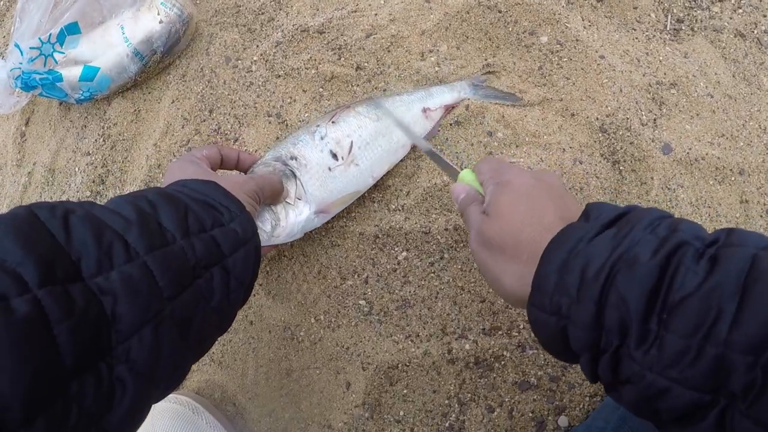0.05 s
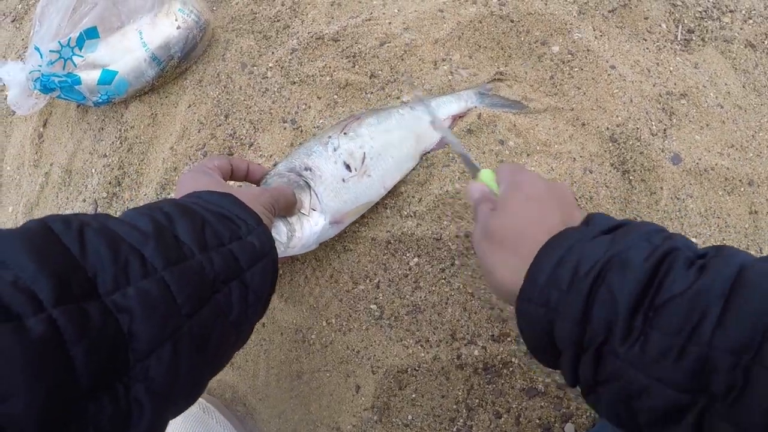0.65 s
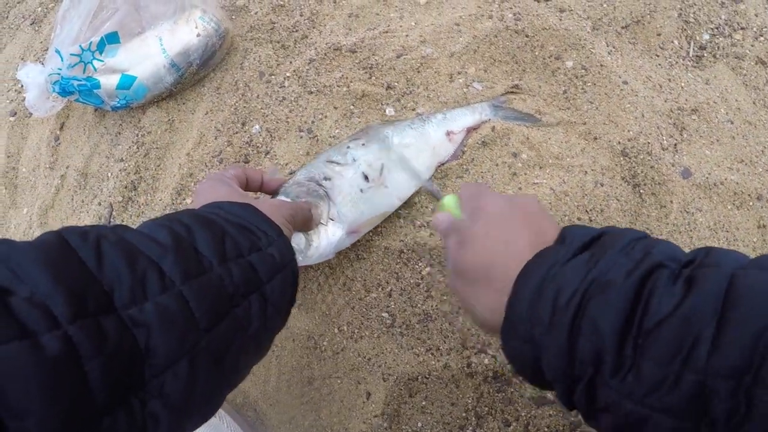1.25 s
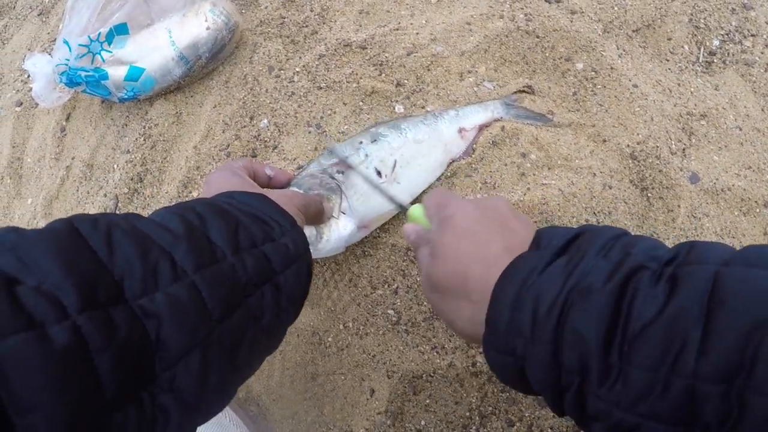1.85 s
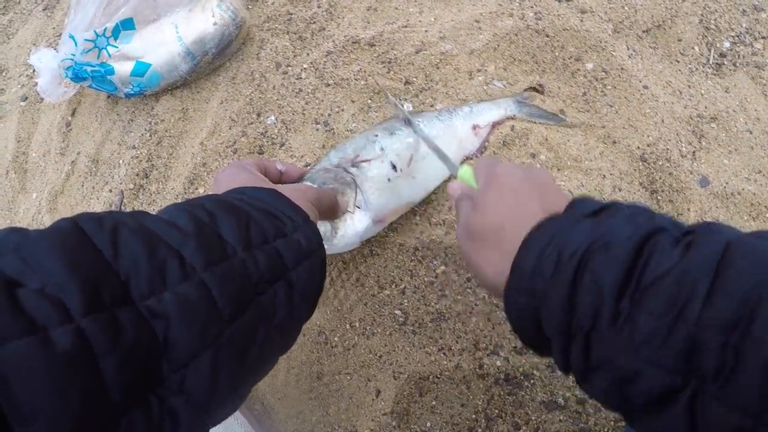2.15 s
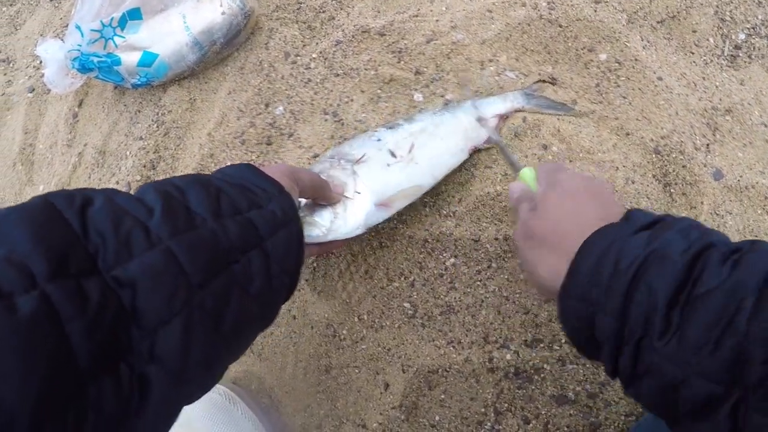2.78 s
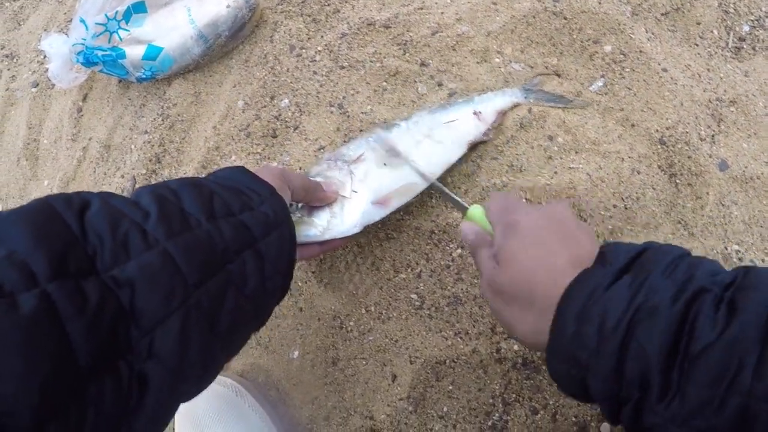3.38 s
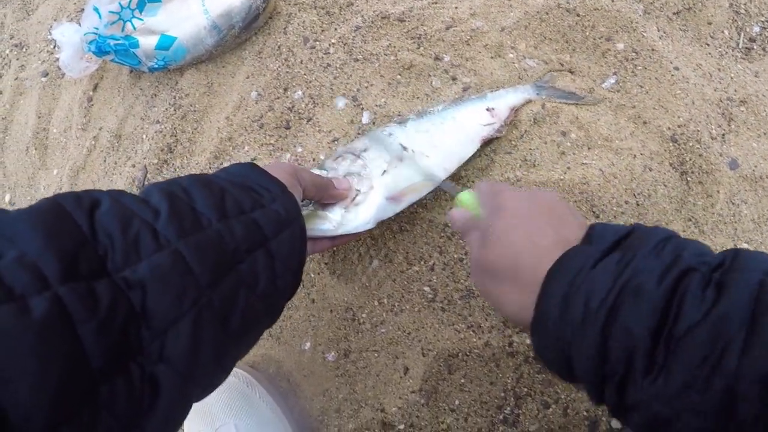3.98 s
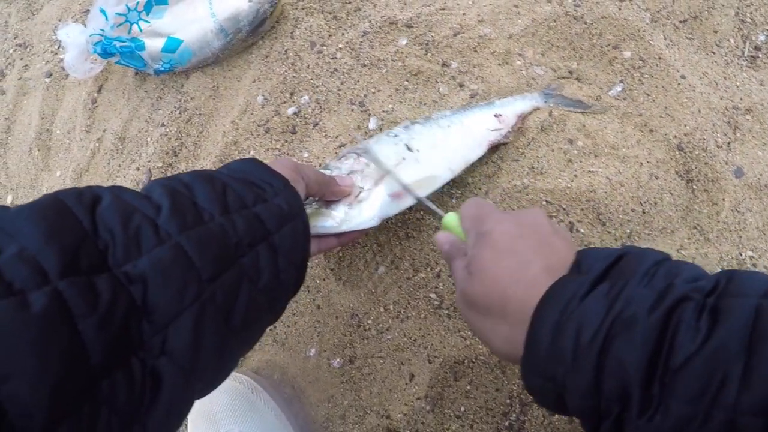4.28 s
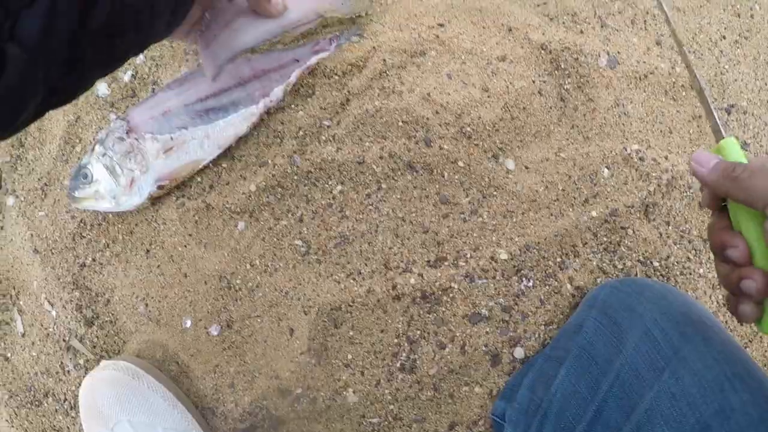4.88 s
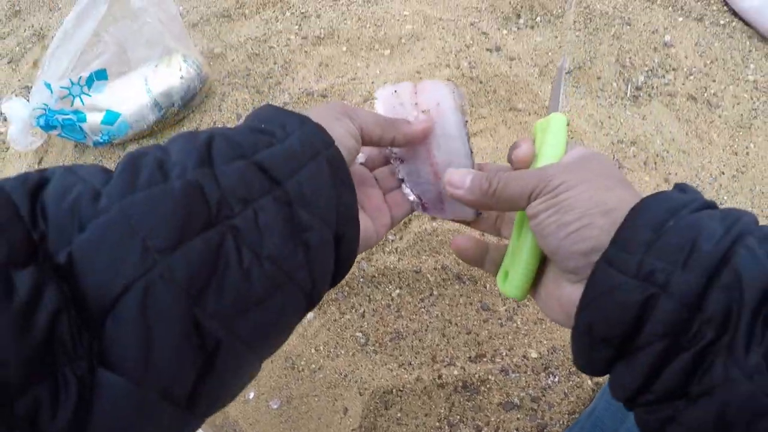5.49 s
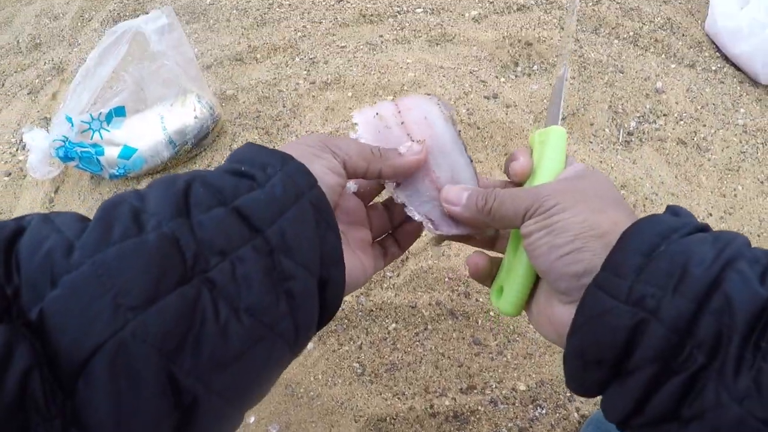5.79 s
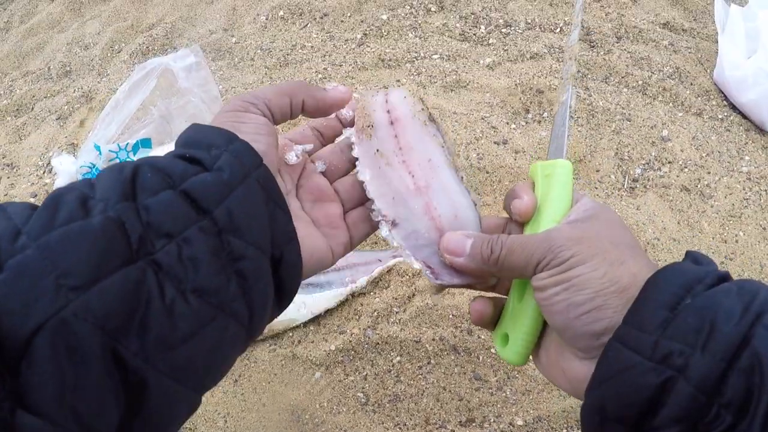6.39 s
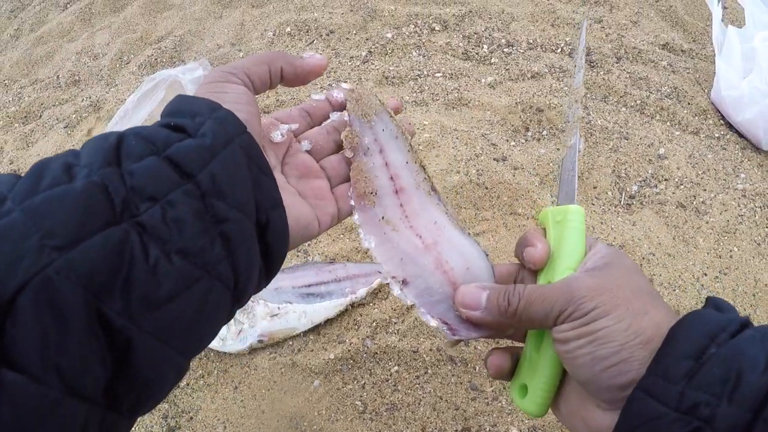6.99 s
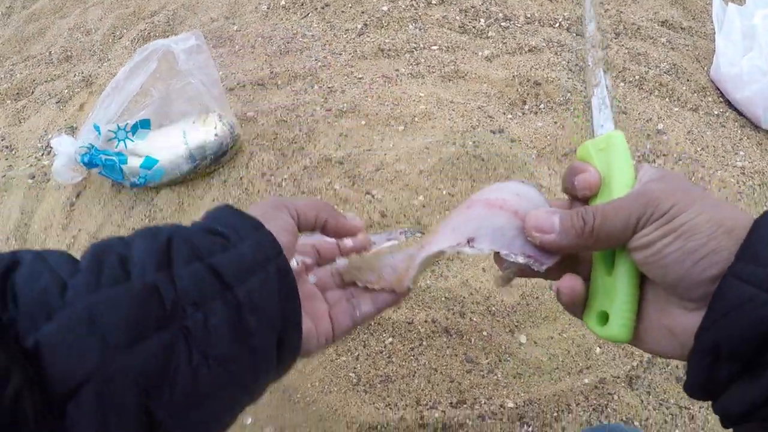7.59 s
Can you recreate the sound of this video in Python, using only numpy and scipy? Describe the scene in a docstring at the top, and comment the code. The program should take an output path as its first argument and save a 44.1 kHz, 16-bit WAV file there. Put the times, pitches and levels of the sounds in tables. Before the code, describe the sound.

On a beach, a knife saws a fillet off a fish in quick, even strokes, rasping through scales, snapping small bones and knocking dully on the backbone. A jacket sleeve swishes along. After about five seconds the cutting stops, sleeve and sand rustle, and the fillet flops over with one wet plop. Wind and muffled surf rumble steadily on the close microphone, with an engine humming far off.

```python
"""On a sandy beach, a knife saws a fillet off a fish, about five and a half strokes a second.
Each push rasps through scales; small bones snap and the blade knocks dully on the backbone.
A jacket sleeve swishes with the arm. Then the fillet is lifted and flops over with a wet plop.
Wind and surf rumble steadily on a camera's closed housing, and an engine hums far off."""
import sys
import numpy as np
from scipy import signal
from scipy.fft import rfft, irfft, next_fast_len
from scipy.io import wavfile
from scipy.ndimage import uniform_filter1d

SR = 44100
rng = np.random.default_rng(int(sys.argv[2]) if len(sys.argv) > 2 else 0)


def inscribe(sig):
    """Save sig as 16-bit PCM at rate SR to the path in sys.argv[1].

    A 1-D sig is mono; a 2-D sig holds one channel per row.
    Samples are clipped to [-1, 1] before scaling.
    """
    pcm = np.round(np.clip(np.atleast_2d(sig).T, -1, 1) * 32767)
    wavfile.write(sys.argv[1], SR, pcm.astype(np.int16))


N = 337265
TIME = np.arange(N) / SR


def from_db(db):
    return 10 ** (np.asarray(db) / 20)

def unit_rms(x):
    return x / np.sqrt(np.mean(x ** 2) + 1e-20)

def curves(rows):
    """Join a table's points in time with straight lines, one curve per column."""
    times, *columns = np.transpose(rows)
    return [np.interp(TIME, times, column) for column in columns]

def add(track, start_s, sound):
    """Lay a short sound into a track."""
    start = int(np.clip(round(start_s * SR), 0, N - 1))
    track[..., start:start + sound.shape[-1]] += sound[..., :N - start]

def coloured(x, points):
    """Shape the tone by (frequency, relative gain) points; it falls away above the last one."""
    size = 8192
    hz, db = np.transpose(points)
    grid = np.maximum(np.arange(size // 2 + 1) * SR / size, 1)
    gain = from_db(np.interp(np.log(grid), np.log(hz), db))
    gain = unit_rms(gain / np.maximum(grid / hz[-1], 1) ** 4)
    cepstrum = irfft(np.log(gain))
    cepstrum[1:size // 2] *= 2   # minimum phase: nothing rings before its cause
    cepstrum[size // 2 + 1:] = 0
    response = irfft(np.exp(rfft(cepstrum)))
    return signal.oaconvolve(np.atleast_2d(x), response[None], axes=1)[:, :N]

def resonance(x, hz, width_hz):
    """Let through a band around one pitch, so that it rings."""
    r = np.exp(-np.pi * width_hz / SR)
    feedback = [1, -2 * r * np.cos(2 * np.pi * hz / SR), r * r]
    return signal.lfilter(np.array([1, 0, -1]) * (1 - r * r) / 2, feedback, x)

def band(x, hz, width_hz):
    """Two resonances in a row: a steeper band, at unit strength."""
    return unit_rms(resonance(resonance(x, hz, width_hz), hz, width_hz))

def drift(per_s):
    """A random wander of about 1 either side of zero."""
    knots = rng.standard_normal(8000)
    return unit_rms(np.interp(TIME * per_s, np.arange(len(knots)), knots))

def stereo_noise(alike):
    """White noise, partly shared by both ears."""
    white = rng.standard_normal((3, N))
    return np.sqrt(alike) * white[0] + np.sqrt(1 - alike) * white[1:]

def diffuse_noise(apart_hz=1250):
    """Noise from all around: alike in both ears in the bass, unrelated in the treble."""
    mid, side = rng.standard_normal((2, N))
    side = signal.sosfilt(signal.butter(2, apart_hz, "high", fs=SR, output="sos"), side)
    return np.array([mid + side, mid - side])

def swell(middle_s, length_s):
    """A bell-shaped rise and fall, like the effort of one arm movement."""
    effort = np.zeros(N)
    near = slice(*np.searchsorted(TIME, [middle_s - 2 * length_s, middle_s + 2 * length_s]))
    effort[near] = np.exp(-2 * ((TIME[near] - middle_s) / length_s) ** 2)
    return effort

def crackle(per_s=2200, spread_db=1.5, cycles=7, count=14):
    """Scales and fibres give way at random, each ringing a few cycles at one of several pitches."""
    sizes = from_db(spread_db * np.minimum(rng.exponential(1, N), 3)) * rng.choice([-1, 1], N)
    clicks = sizes * (rng.random(N) < per_s / SR)
    choice = rng.integers(0, count, N)
    pitches = np.geomspace(1300, 13000, count)
    rings = (resonance(clicks * (choice == k) + 1e-18, hz, hz / cycles) for k, hz in enumerate(pitches))
    return unit_rms(sum(rings))

def thud(peak_s, db, hz, rise_s):
    """A soft bump swells to its peak and dies within a few cycles."""
    t = np.arange(3000) / SR
    envelope = from_db(db) * (t / rise_s) ** 2 * np.exp(2 - 2 * t / rise_s)
    track = np.zeros(N)
    add(track, peak_s - rise_s, envelope * np.sin(2 * np.pi * hz * t))
    return track


# How loud the far engine is: (time [s], level [dB])
ENGINE_LEVELS = [(1.7, -32), (3.4, -26.5), (5.1, -31), (5.6, -23)]

def engine(pitch_hz=96, waver_hz=0.92, waver_db=1.5):
    """A distant engine hums one low note, wavering a little in pitch and loudness."""
    phase = 2 * np.pi * np.cumsum(pitch_hz + waver_hz * drift(5)) / SR
    hum = unit_rms(np.sin(phase) * from_db(waver_db * drift(5.1)))
    return from_db(curves(ENGINE_LEVELS)[0]) * hum

# Tone of the background hiss: (frequency [Hz], gain [dB])
HISS_TONE = [(1000, -9.5), (4500, -0.5), (5400, 1), (6000, 6), (7000, 1), (10000, -1), (12000, -10),
             (14500, -21)]

def hiss(level_db=-64):
    """A faint, steady, high hiss lies behind everything."""
    return coloured(stereo_noise(alike=0.068), HISS_TONE) * from_db(level_db)

# How the weather rises and falls: (time [s], relative wind level [dB], relative surf level [dB])
WEATHER_LEVELS = [(0, -18, -47), (1.3, -18.5, -45), (4, -19, -47), (5.2, -18.5, -46.5), (7, -20.5, -48.5)]
# Tones of the deep wind and the muffled surf: (frequency [Hz], gain [dB])
WIND_TONE = [(15, -19), (30, 0), (45, -1.5), (65, 3), (90, 2), (120, -1.5), (150, -5), (200, -6),
             (260, -11.5), (340, -16.5), (450, -40.5), (800, -67.5)]
SURF_TONE = [(120, -18.5), (330, 1), (480, 2), (600, 3), (660, -5.5), (800, -12), (1000, -16.5),
             (1300, -27), (1900, -33), (2600, -42)]

def wind_and_surf(wind_gain_db=-1, surf_gain_db=12):
    """Wind shakes the whole housing, alike in both ears; the surf comes through it muffled."""
    wind_db, surf_db = curves(WEATHER_LEVELS)
    rumble = unit_rms(coloured(stereo_noise(alike=0.999), WIND_TONE))
    strength = np.sqrt(uniform_filter1d(rumble[0] ** 2, int(0.029 * SR)))
    rumble = unit_rms(rumble / strength ** .5)   # a steady wind, with few lulls
    surf = coloured(diffuse_noise(), SURF_TONE) * from_db(surf_db + surf_gain_db + 0.73 * drift(18))
    return from_db(wind_db + wind_gain_db) * rumble + surf

# Faint squeaks near the end: (time [s], level [dB], pitch [Hz])
SQUEAKS = [(5.854, -42.5, 1010), (5.893, -54, 1530), (6.211, -53, 1690)]

def squeaks(length_s=0.022, rise_hz_per_s=6500):
    """Short, faint tones glide upward."""
    track = np.zeros(N)
    for s, db, hz in SQUEAKS:
        t = TIME - s
        track += from_db(db) * swell(s, length_s) * np.sin(2 * np.pi * (hz + rise_hz_per_s * t / 2) * t)
    return track

# Lifting the fillet: (time [s], sleeve swish level [dB], sandy rustle level [dB])
LIFT_LEVELS = [(4.85, -68, -53.5), (5.1, -59, -50.5), (5.18, -61, -45), (5.27, -57, -48), (5.35, -74, -57),
               (5.9, -69.5, -56), (6.05, -77.5, -62.5), (6.25, -70, -58), (6.45, -78, -65)]
# Tone of the rustle: (frequency [Hz], gain [dB])
RUSTLE_TONE = [(800, 12.5), (2400, -6), (4000, -8), (5000, -9), (6200, 2.5), (8000, -5), (10000, -14),
               (12000, -22), (14500, -27.5)]

def sleeve(swish_db=2, slide_db=6.5, crinkle_db=1.1, grit_db=-12, lead_s=0.062):
    """Nylon swishes and the blade slides grittily before each push; the lift stirs sleeve and sand."""
    drawing = sum(from_db(db) * swell(s - lead_s, 0.036) for s, _, _, db in PUSHES)
    sliding = sum(from_db(db) * swell(s - lead_s, 0.05) for s, _, _, db in PUSHES)
    lift_swish, lift_rustle = from_db(curves(LIFT_LEVELS)) * (TIME > PUSHES[-1][0])
    swish = band(stereo_noise(alike=0.4), hz=1930, width_hz=700)
    rustle = coloured(stereo_noise(alike=0.17), RUSTLE_TONE)
    rustle += from_db(grit_db) * coloured(crackle(), RASP_TONE)
    rustle *= from_db(crinkle_db * drift(90))
    return (swish * (from_db(swish_db) * drawing + lift_swish)
            + rustle * (from_db(slide_db) * sliding + lift_rustle))

def fillet_plop():
    """The wet fillet flops over in the hand."""
    return thud(peak_s=7.043, db=-17, hz=572, rise_s=0.005)

# The notes the blade rings at: (pitch [Hz], width [Hz], gain [dB])
BLADE_NOTES = [(3340, 63, -22), (9350, 140, 5)]

def blade_ring(cutting):
    """Cutting makes the blade ring briefly, damped by the flesh."""
    return sum(from_db(db) * resonance(cutting, hz, width) for hz, width, db in BLADE_NOTES)

# The blade catching on the backbone: (time [s], level [dB])
BACKBONE_KNOCKS = [(1.055, -19.5), (1.235, -23), (1.432, -17), (1.805, -19), (1.998, -17.5), (2.165, -20),
                   (2.182, -17), (2.344, -15), (2.362, -17), (2.569, -13.5), (3.34, -13.5), (3.349, -14.5),
                   (3.513, -17), (3.682, -11.5), (3.73, -15.5), (3.877, -19), (3.888, -10), (3.894, -15),
                   (4.036, -12.5), (4.054, -16), (4.075, -13.5), (4.105, -16.5), (4.227, -15),
                   (4.243, -13.5), (4.254, -14), (4.27, -14.5), (4.313, -17), (4.405, -19), (4.429, -16.5),
                   (4.452, -13), (4.605, -9.5), (4.623, -14), (4.649, -17.5), (4.835, -19), (4.846, -17.5)]

def backbone_knocks(pitch_hz=452, scatter_hz=38, rise_s=0.00285):
    """The blade bumps over the backbone and the fish's body thuds, each time at a slightly new pitch."""
    pitches = pitch_hz + scatter_hz * rng.standard_normal(len(BACKBONE_KNOCKS))
    return sum(thud(s, db, hz, rise_s) for (s, db), hz in zip(BACKBONE_KNOCKS, pitches))

# Bones and scales giving way: (time [s], relative crack level [dB], relative tock level [dB])
BONE_SNAPS = [(0.14, -34.5, -42), (0.1589, -29.5, -31), (0.176, -29.5, -24.5), (.301, -36, -44),
              (0.3443, -27.5, -29.5), (0.3496, -30.5, -33), (0.3643, -30.5, -35), (.466, -45, -46),
              (0.5011, -26, -25), (.5172, -38, -37), (0.5234, -33, -53), (.6852, -32, -35),
              (0.8587, -27.5, -29), (.8744, -35, -33), (1.0328, -30.5, -24.5), (1.052, -37, -32),
              (1.204, -36, -34.5), (1.2273, -28, -29.5), (1.4083, -35, -48), (1.4163, -38, -38),
              (1.969, -40, -34), (2.1439, -38, -38), (2.3384, -37, -35), (2.3573, -39, -41),
              (2.3914, -38.5, -36), (2.5432, -31.5, -37), (2.562, -38, -41), (2.7597, -35, -40),
              (2.779, -32, -32), (2.8004, -34, -35.5), (2.9353, -34, -42), (2.9467, -28, -35),
              (2.9503, -32, -28), (2.9585, -30, -39), (2.9739, -28, -38), (3.041, -42, -52),
              (3.1482, -25.5, -38), (3.167, -35, -32.5), (3.3186, -27.5, -30), (3.3336, -35, -38),
              (3.475, -31.5, -36), (3.4937, -29, -32), (3.6705, -35, -38), (3.6882, -44, -35),
              (3.7278, -44, -37), (3.859, -29.5, -38), (3.8752, -35, -31), (3.8899, -24, -31),
              (3.905, -26, -29), (3.945, -43.5, -38), (4.0553, -31, -51), (4.071, -30, -31.5),
              (4.0978, -35.5, -33), (4.2235, -28, -42), (4.265, -45, -32), (4.2688, -29.5, -31.5),
              (4.308, -47, -36.5), (4.4029, -31, -34.5), (4.4234, -33, -41), (4.4489, -34.5, -26.5),
              (4.582, -29, -46), (4.6026, -31, -47), (4.619, -42, -34), (4.6466, -30.5, -27),
              (4.8166, -36.5, -33)]
# Tone of a bone's low tock: (frequency [Hz], gain [dB])
TOCK_TONE = [(300, 14.5), (700, 13.5), (1150, 12), (1600, 1.5), (3300, -1.5), (4200, -15), (7000, -36.5)]

def bone_snaps(attack_s=0.0019, crack_s=0.00085, crumble_s=0.0036, crumble_db=-8, ring_db=-1,
               crisp_db=21.5, crisp_hz=2800, tock_db=24, jolt_db=13):
    """Each snap swells in quickly, cracks at its own pitch, then crumbles; the jolt makes it tock."""
    t = (np.arange(1200) - 300) / SR   # the break is at t = 0
    crack = np.exp(-abs(t) / crack_s)
    crumble = from_db(crumble_db) * np.exp(-abs(t) / np.where(t < 0, attack_s, crumble_s))
    crisp, tocks = np.zeros((2, N)), np.zeros((2, N))
    pitches = 3000 * 2 ** rng.uniform(0, 1.96, len(BONE_SNAPS))
    for (s, high_db, low_db), hz in zip(BONE_SNAPS, pitches):
        white = rng.standard_normal((3, len(t)))
        burst = white[0] * crack + white[1:] * crumble
        ringing = burst + from_db(ring_db) * resonance(burst, hz, width_hz=700)
        jolt = burst / 2 + from_db(jolt_db) * (t == 0)
        add(crisp, s + t[0], from_db(high_db + crisp_db) * ringing / np.linalg.norm(ringing[0]))
        add(tocks, s + t[0], from_db(low_db + tock_db) * jolt / np.linalg.norm(jolt[0]))
    crisp = signal.sosfilt(signal.butter(2, crisp_hz, "high", fs=SR, output="sos"), crisp)
    return coloured(crisp, RASP_TONE) + coloured(tocks, TOCK_TONE)

# Each push of the knife, and the draw back before it:
# (middle time [s], length [s], relative rasp level [dB], relative draw-back level [dB])
PUSHES = [(0.151, 0.073, -47.5, -59), (0.353, 0.034, -44, -55.5), (0.52, 0.035, -50, -57),
          (0.677, 0.045, -41.5, -57.5), (0.869, 0.041, -41.5, -55), (1.048, 0.047, -41, -56.5),
          (1.224, 0.043, -42.5, -60), (1.417, 0.033, -39.5, -55), (1.606, 0.058, -51, -52.5),
          (1.8, 0.061, -48, -53.5), (1.984, 0.053, -44.5, -58), (2.165, 0.059, -46, -54),
          (2.351, 0.056, -49, -58), (2.547, 0.069, -44, -55.5), (2.773, 0.04, -37.5, -56.5),
          (2.957, 0.054, -38, -57.5), (3.138, 0.071, -40.5, -52), (3.322, 0.047, -37.5, -54),
          (3.492, 0.038, -40, -55), (3.675, 0.036, -40.5, -53.5), (3.878, 0.049, -46, -50),
          (4.041, 0.025, -41, -53.5), (4.233, 0.043, -41, -60), (4.412, 0.033, -45, -54),
          (4.592, 0.038, -48, -64), (4.815, 0.047, -42, -64)]
# How hard the blade drags in the flesh: (time [s], level [dB])
DRAG_LEVELS = [(0, -33), (1.4, -37), (2.1, -29.5), (2.55, -27.5), (2.8, -39), (3.1, -33), (3.35, -28),
               (4.1, -27.5), (4.8, -32)]
# Tone of tearing scales, shared by cracks and grit: (frequency [Hz], gain [dB])
RASP_TONE = [(500, 1.5), (1200, 8.5), (2200, 3.5), (3300, -3), (3800, -9.5), (4600, 1), (5100, 1),
             (6400, 9.5), (7400, 10), (9600, 1.5), (11000, -2.5), (13000, -11.5), (15500, -24.5)]

def knife_rasp(grain_db=-5, noise_db=-4, judder_db=3, brightness_db=2.5,
               drag_lag_s=0.0075, drag_s=0.032, crunch_db=-21, loose_db=-41):
    """Each push rips scales, then rubs and crunches in wet flesh; loose scales crackle in between."""
    push = sum(from_db(db) * swell(s, length) for s, length, db, _ in PUSHES)
    judder = from_db(judder_db * np.clip(drift(220), -2, 2))   # the blade sticks and slips
    scales = from_db(grain_db) * crackle() + from_db(noise_db) * stereo_noise(alike=0.3)
    tearing = push * judder * scales
    dull = signal.sosfilt(signal.butter(1, 5000, fs=SR, output="sos"), tearing)
    tearing = dull + from_db(brightness_db * drift(20)) * (tearing - dull)   # some patches are crisper
    pressure = from_db(curves(DRAG_LEVELS)[0]) * (TIME < LIFT_LEVELS[0][0])   # stops at the lift
    drag = pressure * sum(swell(s + drag_lag_s, drag_s) for s, *_ in PUSHES)
    flesh = band(rng.standard_normal(N), hz=400, width_hz=240)
    grit = unit_rms(resonance(crackle(), hz=3000, width_hz=1500)) * judder
    crunch = grit * (from_db(crunch_db) * drag + from_db(loose_db) * pressure)
    return coloured(tearing, RASP_TONE) + drag * flesh + crunch

def scene():
    """The knife work and the handling of the fish, over the sounds of the beach."""
    cutting = knife_rasp() + bone_snaps()
    knife = cutting + blade_ring(cutting) + backbone_knocks()
    return knife + fillet_plop() + sleeve() + squeaks() + wind_and_surf() + hiss() + engine()

# The housing's two sound openings: (frequency [Hz], left minus right [dB], left's head start [rad])
HOUSING_OPENINGS = [(250, 0, 0), (650, -6, -0.1), (1050, -3, 1.3), (2200, 1, 0.9), (2800, 1, 0),
                    (5000, -4, 0), (6200, -10, 1.8), (7700, -1, 2.9), (9500, -3, 4.6), (12000, -4, 7.5)]

def record(dry, ceiling=0.77, cutoff_hz=15400):
    """Each opening has its own tone and delay; loud peaks are rounded and the highest treble is cut."""
    size = next_fast_len(N + SR)
    hz, *columns = np.transpose(HOUSING_OPENINGS)
    grid = np.log(np.maximum(np.arange(size // 2 + 1) * SR / size, 1))
    apart_db, lead = (np.interp(grid, np.log(hz), column) for column in columns)
    half = np.array([[1], [-1]]) / 2   # left goes up by half, right goes down by half
    response = from_db(half * apart_db) * np.exp(1j * half * lead)
    heard = irfft(rfft(dry, size) * response, size)[:, :N]
    rounded = ceiling * np.tanh(heard / ceiling)
    return signal.sosfiltfilt(signal.cheby1(10, .1, cutoff_hz, fs=SR, output="sos"), rounded)


dry = scene()
out = record(dry)
inscribe(out)
```